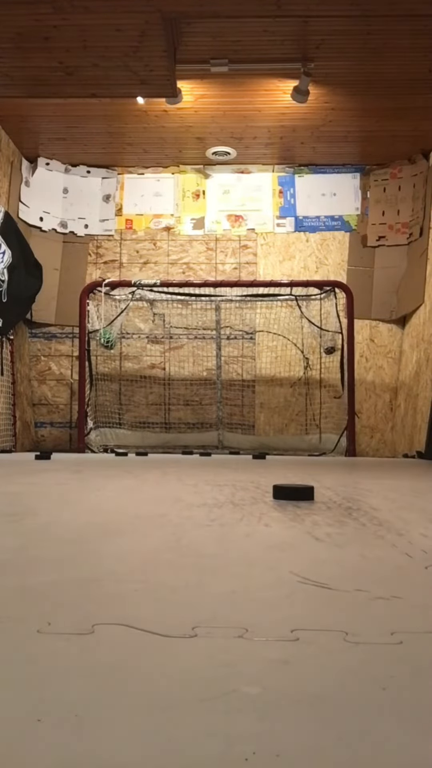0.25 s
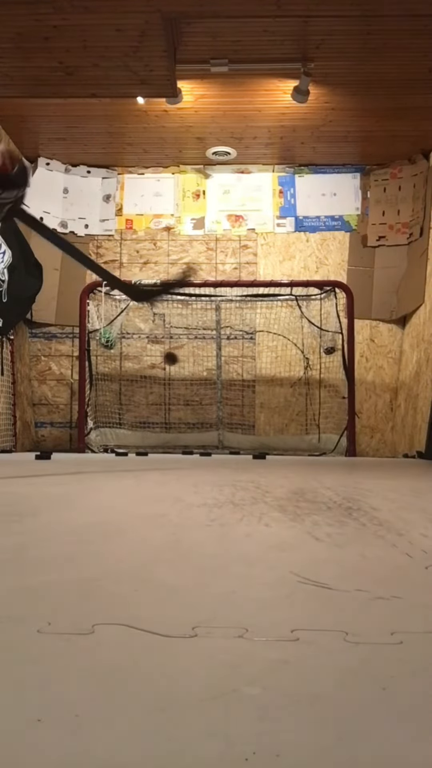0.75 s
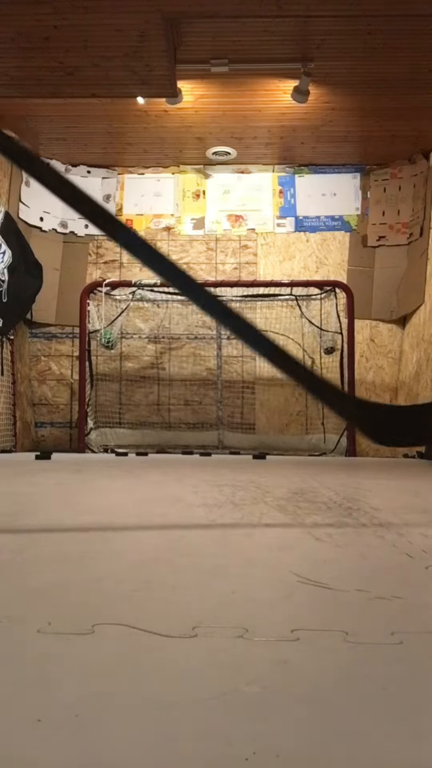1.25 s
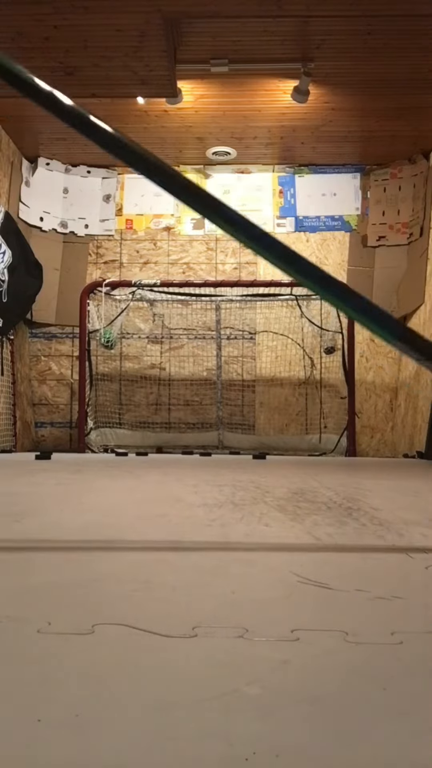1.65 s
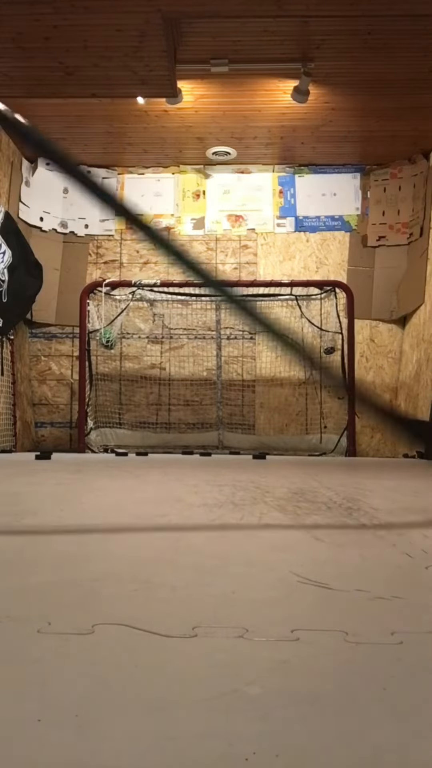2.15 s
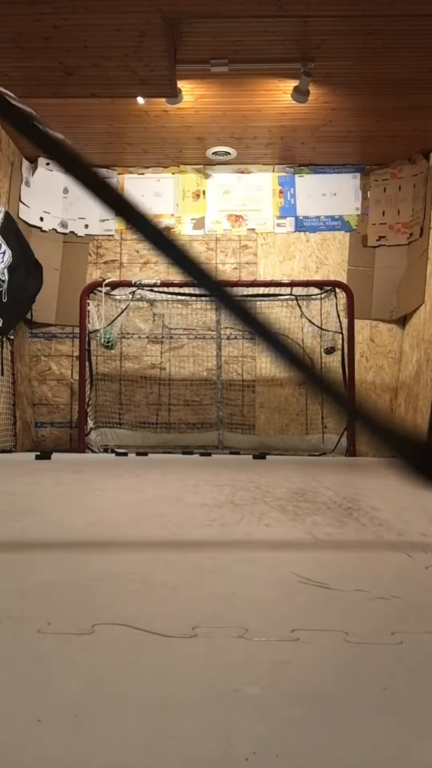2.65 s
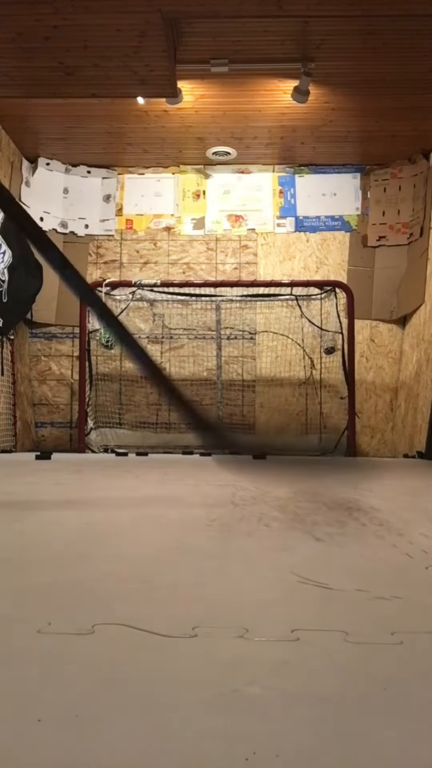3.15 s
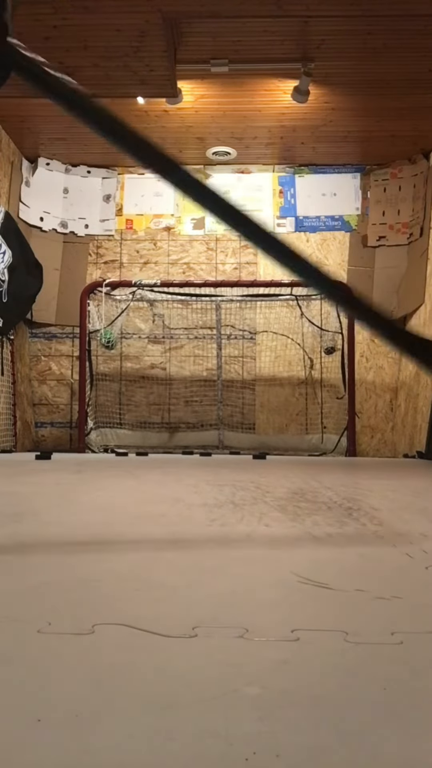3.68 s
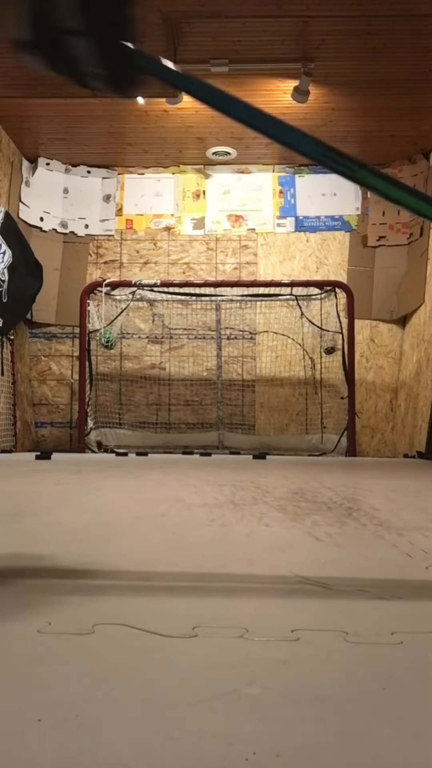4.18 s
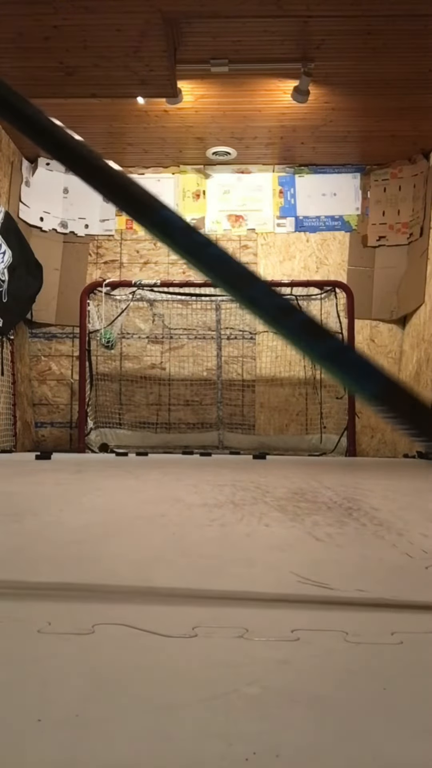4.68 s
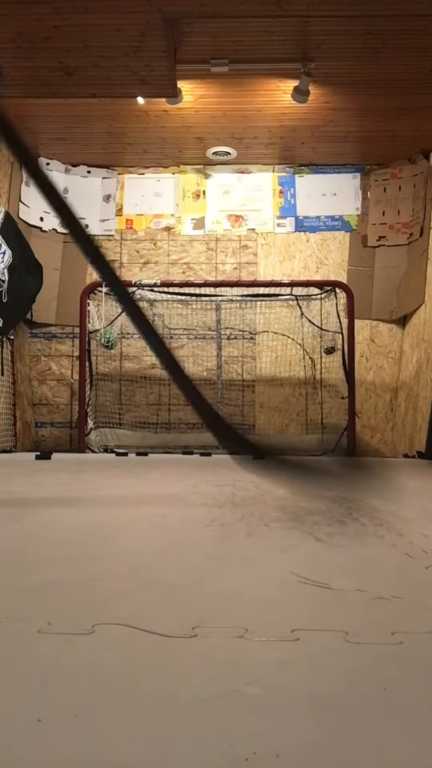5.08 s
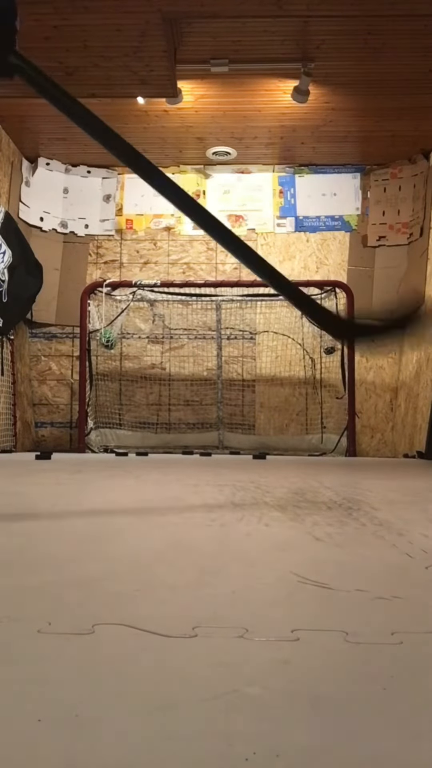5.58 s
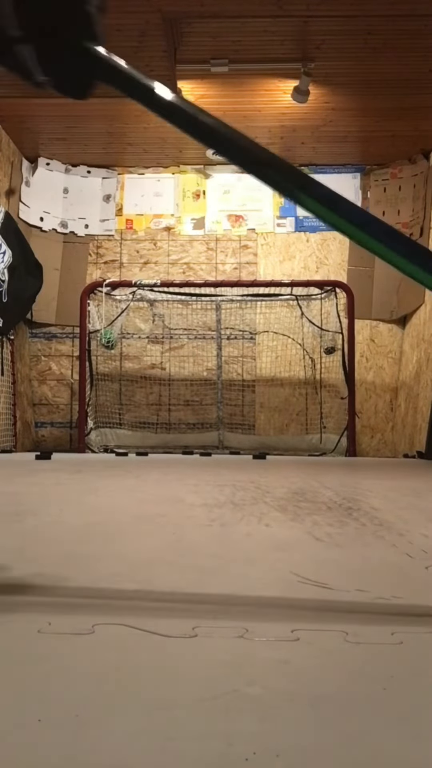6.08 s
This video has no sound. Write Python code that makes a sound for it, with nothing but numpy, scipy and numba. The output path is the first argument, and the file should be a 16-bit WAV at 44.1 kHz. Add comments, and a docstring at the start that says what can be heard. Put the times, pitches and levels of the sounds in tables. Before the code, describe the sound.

In a small wood-lined basement, a phone lying close to the floor picks up a hockey stick on hollow plastic tiles. A soft drag leads to a sharp slap, then taps and low groaning scrapes. A loud slam rings the steel goal post, more knocks follow, and another slam hits before two final hard knocks and a groaning drag.

```python
"""A hockey stick drags, taps and shoots rubber pucks on plastic floor tiles in a wood-lined basement.
A soft drag comes first, then knocks that ring the tiles; a hard stick slap soon cracks close to the phone.
Around two seconds slowing drags groan; midway a hard slam sets the steel goal post ringing.
Taps and drags follow, then another slam with a faint ring, two hard knocks and a last groaning drag.
Knocks and slides are filtered noise and fading tones; the room echoes most of them and a phone limits the hits."""
import sys
import numpy as np
from scipy import signal
from scipy.fft import rfft, irfft
from scipy.io import wavfile
from numba import njit

SR = 44100
rng = np.random.default_rng(int(sys.argv[2]) if len(sys.argv) > 2 else 0)


def transcribe(u):
    """Save the signal u as a 16-bit wav file named by the first command-line argument.

    u: samples, shape (n,) or (channels, n), limited to [-1, 1]; the rate is SR.
    q: integer samples, one column per channel.
    """
    v = np.clip(np.atleast_2d(u).T, -1, 1)
    q = np.round(v * 32767).astype(np.int16)
    wavfile.write(sys.argv[1], SR, q)


N = 279153  # length in samples
SWELL_DB, FADE_DB = 22.5, 31.5  # a drag climbs this much as it starts and loses this much as it ends


def undb(db):
    """Turns decibels into an amplitude factor."""
    return 10 ** (np.asarray(db) / 20)


def unit(x):
    """Scales to an rms of 1."""
    return x / np.sqrt(np.mean(x ** 2))


def peak(x):
    """Scales to a peak of 1."""
    return x / np.abs(x).max()


def add(bus, start_s, x):
    """Mixes x into the bus at start_s seconds."""
    i = int(start_s * SR)
    bus[i:i + len(x)] += x[:len(bus) - i]


def fade(t, t60):
    """Dies away by 60 dB in t60 seconds."""
    return np.exp(-np.log(1000) * t / t60)


def rise(t, rise_s):
    """Soft start: rubber needs a moment to load."""
    return (1 - np.exp(-t / rise_s)) ** 2


def band(x, hz, width_hz):
    """A resonance with gain 1 at its centre."""
    return signal.lfilter(*signal.iirpeak(hz, hz / width_hz, fs=SR), x)


@njit
def sweep(x, hz, k):
    """A band-pass whose centre moves; k is its width divided by its centre."""
    y, band_state, low_state = np.empty(len(x)), 0., 0.
    for i in range(len(x)):
        g = np.tan(np.pi * hz[i] / SR)
        v = (band_state + g * (x[i] - low_state)) / (1 + g * (g + k))
        band_state = 2 * v - band_state
        low_state = low_state + 2 * g * v
        y[i] = k * v
    return y


def humps(x, body):
    """Colours x with broad resonances whose powers add."""
    hz = np.fft.rfftfreq(len(x), 1 / SR) + 1  # 1 Hz up, to keep the logarithm finite
    power = 0
    for centre_hz, spread_octaves, db in body:
        octaves_away = np.log2(hz / centre_hz)
        power = power + undb(2 * db) * np.exp(-.5 * (octaves_away / spread_octaves) ** 2)
    return unit(irfft(rfft(x) * np.sqrt(power), len(x)))


def ring(modes, t, scatter_db, detune):
    """Fading tones of a struck body; every blow lands elsewhere and wakes them differently."""
    total = 0
    for hz, db, t60 in modes:
        level_luck, pitch_luck = rng.standard_normal(2)
        tone = np.sin(2 * np.pi * hz * (1 + detune * pitch_luck) * t)
        total = total + undb(db + scatter_db * level_luck) * fade(t, t60) * tone
    return total


def low_hum():
    """A faint, steady low hum: noise through two resonances."""
    return undb(-65) * unit(band(band(rng.standard_normal(N), 270, 70), 220, 100))


def room(x):
    """Dense echoes that build up over some ms and die band by band."""
    # how the room echoes at each pitch: (f/Hz, time to fall 60 dB/s, level/dB)
    echo_bands = np.array([(95, 0.17, 0), (250, 0.43, 2.5), (750, 0.42, 1.5), (1800, 0.59, -3.5),
                           (4800, 0.53, 5.5), (9600, 0.3, -1.5), (13600, 0.077, -3)])
    t = np.arange(SR) / SR
    echo = 0
    for hz in 100 * 2 ** np.arange(0, 7.3, .5):  # half-octave steps
        t60, db = (np.interp(np.log(hz), np.log(echo_bands[:, 0]), echo_bands[:, k]) for k in (1, 2))
        noise = band(band(rng.standard_normal(SR), hz, hz / 2), hz, hz / 2)
        echo = echo + undb(db) * noise * fade(t, t60)
    echo = echo * (1 - np.exp(-t / 0.0023))
    return signal.fftconvolve(x, echo / np.sqrt(np.sum(echo ** 2)))[:N]


def groan():
    """The blade judders as a drag slows: noise in a narrow, rough resonance that sinks."""
    # groaning drags: (start t/s, swell/s, release/s, first f/Hz, last f/Hz, level/dB)
    groaning_drags = [(2.069, 0.094, 0.17, 430, 286, -28.5), (2.6, 0.1074, 0.013, 934, 553, -22),
                      (6.075, 0.016, .18, 385, 221, -13.5)]
    out = np.zeros(N)
    for start_s, swell_s, release_s, first_hz, last_hz, db in groaning_drags:
        t = np.arange(int((swell_s + release_s) * SR)) / SR
        hz = first_hz * (last_hz / first_hz) ** (t / t[-1])
        noise = rng.standard_normal(len(t))
        rub = unit(sweep(sweep(noise, hz, .2), hz, .3))
        level_db = np.interp(t, [0, swell_s, t[-1]], [db - SWELL_DB, db, db - FADE_DB])
        soft_end = np.clip((t[-1] - t) / .01, 0, 1)
        add(out, start_s, rub * soft_end * undb(level_db))
    return out


def slides():
    """Grit catches and lets go in dense uneven ticks; the rasp brightens with the speed of the stroke."""
    # blade and puck sliding: (start t/s, attack/s, hold/s, release/s, rasp level/dB, hiss level/dB,
    # rumble level/dB, rasp centre f/Hz, hiss centre f/Hz)
    strokes = [(0.0, 0.00077, 0.038, .09, -54.5, -59, -63, 4300, 4800),
               (0.09, 0.047, 0.048, 0.067, -69.5, -60, -55, 2000, 6130),
               (0.19, 0.071, 0.071, 0.043, -57.5, -58.5, -63, 2840, 5600),
               (0.333, 0.062, 0.11, 0.031, -49.5, -45.5, -44.5, 3700, 5600),
               (0.451, 0.032, 0.044, 0.088, -17.5, -33, -27.5, 2000, 4830),
               (0.947, 0.072, 0.035, 0.16, -38.5, -39, -38, 1940, 6100),
               (1.152, 0.031, 0.056, 0.077, -53, -45, -45, 676, 5840),
               (1.2, 0.11, 0.13, 0.11, -46, -40.5, -47, 2130, 5800),
               (1.779, 0.0069, 0.0047, 0.14, -37, -98, -24, 557, 4800),
               (1.893, 0.018, 0.18, .02, -60, -72, -37, 590, 4800),
               (2.059, .01, 0.18, 0.029, -94, -86, -37.5, 630, 4700),
               (2.28, 0.011, 0.0042, 0.21, -78, -49.5, -27.5, 620, 5840),
               (2.385, 0.084, 0.047, 0.076, -32.5, -53, -38, 3300, 4100),
               (2.493, 0.052, 0.15, 0.24, -41, -59, -31, 726, 4800),
               (3.005, 0.036, 0.039, 0.049, -29, -27.5, -30, 1505, 4380),
               (3.252, 0.052, 0.031, 0.095, -45.5, -49.5, -48, 4200, 4700),
               (4.007, 0.02, 0.0033, 0.14, -51, -90, -34.5, 1800, 4500),
               (4.096, .03, 0.077, 0.22, -59.5, -69.5, -75, 1200, 4700),
               (4.282, 0.019, .005, 0.46, -55.5, -70, -41, 730, 5570),
               (4.812, 0.086, .1, 0.032, -34, -50.5, -34.5, 1780, 4800),
               (4.97, 0.03, 0.018, 0.086, -30.5, -33.5, -29.5, 2600, 4670),
               (5.773, 0.036, 0.0057, 0.14, -45.5, -55, -52, 2660, 5000),
               (6.063, 0.014, 0.018, 0.075, -27.5, -46, -35, 3820, 4300)]
    # broad resonances that colour the rasp, hiss and rumble: (f/Hz, spread/octaves, level/dB)
    rasp_body = [(1200, 0.31, 4.5), (2570, 0.51, 19.5), (3960, 0.37, 15.5)]
    hiss_body = [(5000, .6, -3), (8500, .25, -6), (13000, .3, -14)]
    rumble_body = [(173, 0.087, -3.5), (260, 0.26, -1.5), (422, 0.9, -2.5), (645, 0.065, -4)]
    glide_octaves = 0.22  # the rasp centre lies this much lower at the slow ends of a stroke

    grit = rng.standard_normal(N) * undb(1.3 * rng.exponential(size=N))
    flutter = unit(band(rng.standard_normal(N), 40, 170))
    grit = grit * undb(2.0 * flutter)
    all_rasp, all_hiss, all_rumble = (humps(grit, body) for body in (rasp_body, hiss_body, rumble_body))
    out = np.zeros(N)
    for start_s, attack_s, hold_s, release_s, rasp_db, hiss_db, rumble_db, rasp_hz, hiss_hz in strokes:
        t = np.arange(int((attack_s + hold_s + release_s) * SR)) / SR
        early = np.clip(1 - t / attack_s, 0, 1)  # 1 at the start, 0 after the attack
        late = np.clip((t - attack_s - hold_s) / release_s, 0, 1)  # climbs to 1 in the release
        start = int(start_s * SR)
        span = slice(start, start + len(t))
        low = rasp_hz * 2 ** (-glide_octaves * (early + late))
        high = np.full(len(t), float(hiss_hz))
        rasp = all_rasp[span] + unit(sweep(sweep(grit[span], low, .7), low, .9))
        hiss = all_hiss[span] + undb(-4.5) * unit(sweep(sweep(grit[span], high, .25), high, .35))
        soft_ends = np.clip(np.minimum(t, t[-1] - t) / 0.01, 0, 1)
        touch = undb(-SWELL_DB * early - FADE_DB * late) * soft_ends
        mix = undb(rasp_db) * unit(rasp) + undb(hiss_db) * unit(hiss) + undb(rumble_db) * all_rumble[span]
        add(out, start_s, touch * mix)
    return out


def hit_pulse(tilt_db):
    """One pulse with the colour of a hard hit, tilted by tilt_db per octave around 2000 Hz."""
    # colour of the hard hits: (f/Hz, level/dB)
    hit_colour = np.array([(59, -40), (100, -22.5), (389, -0.5), (662, -5.5), (930, -16.5), (1360, -6.5),
                           (2170, -6.5), (2580, -4.5), (2800, -5.5), (6990, -12), (16000, -29)])
    hz = np.fft.rfftfreq(2048, 1 / SR) + 1
    colour_db = np.interp(np.log(hz), np.log(hit_colour[:, 0]), hit_colour[:, 1])
    cepstrum = irfft(np.log(undb(colour_db + tilt_db * np.log2(hz / 2000))))
    cepstrum[1:1024] *= 2  # folding keeps the pulse from starting before the blow
    cepstrum[1025:] = 0
    return peak(irfft(np.exp(rfft(cepstrum))))


def hard_hits():
    """Each hard slap or slam cracks once, then clatters for a while in a burst of noise."""
    # hard slaps and slams: (t/s, blow level/dB, blow tilt/dB per octave, clatter level/dB,
    # clatter hold/s, clatter tilt/dB per octave)
    hit_list = [(0.471, -16, 1, -34, 0.043, -2.5), (3.505, -3.5, 1.5, -25, 0.081, 2),
                (5.469, -9.5, 0.5, -17.5, 0.045, 3)]
    crack, clatter, t = np.zeros(N), np.zeros(N), np.arange(SR // 2) / SR
    for start_s, blow_db, tilt_db, clatter_db, hold_s, clatter_tilt_db in hit_list:
        add(crack, start_s, undb(blow_db) * hit_pulse(tilt_db))
        shake = rng.standard_normal(len(t)) * fade(np.maximum(t - hold_s, 0), 0.19)
        add(clatter, start_s, undb(clatter_db) * signal.fftconvolve(hit_pulse(clatter_tilt_db), shake))
    return crack, clatter


def goal_post():
    """The struck steel post rings on as fading tones until it stops."""
    # goal post set ringing: (t/s, ring level/dB, ring stops at t/s)
    post_strikes = [(3.505, -25.5, 4.31), (5.469, -50, 6.04)]
    # tones of the steel post: (f/Hz, level/dB, time to fall 60 dB/s)
    post_tones = [(2379, 0, 1.8), (2415, -3, 1.7), (2432, -3, 1.3), (2451, -4, 1.2), (2561, 11, .55),
                  (2639, 9, .3)]
    out, t = np.zeros(N), np.arange(2 * SR) / SR
    for start_s, post_db, stop_s in post_strikes:
        stop = np.clip((stop_s - start_s - t) / .04, 0, 1)  # a 40 ms ramp down to silence
        add(out, start_s, undb(post_db) * ring(post_tones, t, 0, 0) * stop)
    return out


def tile_thud(t, centre_hz):
    """Hollow tiles ring; the spot that is struck favours the tones near one pitch."""
    # tones of the hollow tiles: (f/Hz, level/dB, time to fall 60 dB/s)
    tile_tones = [(151, -20.5, 0.02), (186, 1, 0.086), (240, 1, 0.086), (299.7, -5.5, 0.14),
                  (411, -3, 0.12), (568, 2.5, 0.055), (703, -3, 0.093)]
    spot = [(hz, db - 4.15 * abs(np.log2(hz / centre_hz)), t60) for hz, db, t60 in tile_tones]
    return peak(ring(spot, t, 1.4, 0.066) * rise(t, 0.002))


def blade_crack(t):
    """Short tones of the blade, roughened as the contact skids for a few ms."""
    # tones of the blade: (f/Hz, level/dB, time to fall 60 dB/s)
    blade_tones = [(850, -3, .012), (1200, -2, .01), (1650, 0, .01), (2200, 0, .009), (2900, -4, .007),
                   (3800, -8, .005)]
    chatter = rng.standard_normal(2000) * fade(t[:2000], .035)
    blade = ring(blade_tones, t, 2., .06) * rise(t, .0006)
    return peak(np.convolve(blade, chatter)[:len(t)])


def sharp_tick(t):
    """A brief burst of bright noise at the contact."""
    grit = rng.standard_normal(len(t)) * fade(t, .02) * rise(t, 0.00012)
    return peak(band(band(grit, 5500, 5000), 5500, 8000))


def knocks():
    """Thud, crack and tick of each knock, straight to the phone and into the room."""
    # stick and puck knocks: (t/s, tile thud level/dB, blade crack level/dB, sharp tick level/dB,
    # room share level/dB, thud centre f/Hz)
    knock_list = [(0.123, -27.5, -40.5, -52, 4, 250), (0.334, -30, -39, -56, 6, 248),
                  (0.4442, 0, 5.5, -10.5, -4, 300), (0.459, -17, -7.5, -2.5, -16, 243),
                  (1.06, -25, -56, -21.5, 6, 226), (1.187, -17.5, -28, -43, -1.5, 219),
                  (1.22, -18.5, -21, -45, 5, 306), (1.655, -66, -46, -58, 0.5, 227),
                  (1.782, -29.5, -19, -43.5, -7, 605), (1.79, -17.5, -20.5, -68, -19, 482),
                  (2.048, -12.5, -14.5, -56, -0.5, 316), (2.26, -3.5, -5.5, -11, 0, 266),
                  (2.569, -50, -16.5, -62, 6.5, 620), (2.794, -5.5, -3.5, -9.5, 1.5, 175),
                  (2.879, -12.5, -14, -42, 1.5, 204), (2.924, -24, -48, -48, -20.5, 231),
                  (3.022, -15.5, -13, -33.5, 2, 256), (3.439, -58, -44.5, -47.5, 3.5, 183),
                  (3.505, -19, -10, -18.5, -18, 330), (3.65, -29, -49, -35, 23, 470),
                  (4.013, -18.5, -20, -55, -15, 234), (4.104, -27.5, -33.5, -62.5, 6, 305),
                  (4.307, -31.5, -47, -46, 15.5, 343), (4.395, -57, -60, -51.5, -13.5, 304),
                  (4.488, -21.5, -26, -68, 1, 240), (4.498, -8, -12, -29, 1, 413),
                  (4.527, -11, -14.5, -59, -19, 208), (4.603, -11.5, -19.5, -51, 1, 236),
                  (4.681, -12, -21, -69, -0.5, 244), (4.735, -13.5, -27, -70, 4, 240),
                  (4.776, -19.5, -26, -62.5, 0, 183), (4.834, -19, -28, -53, -10, 168),
                  (5.071, -20.5, -14.5, -49, -1.5, 344), (5.335, -35.5, -64, -76.5, -7, 176),
                  (5.47, -19, -10.5, -13.5, 4.5, 310), (5.801, -48.5, -51, -38.5, 6, 250),
                  (6.039, -3, -6, -17.5, 0.5, 413), (6.077, -28, -20, -37, 5, 373),
                  (6.089, -1.5, -33, -34, 1, 237)]
    near, far, t = np.zeros(N), np.zeros(N), np.arange(SR // 4) / SR
    impulse = 1. * (t == 0)
    dull_click = peak(band(band(impulse, 1300, 2500), 1500, 2300))
    bright_click = peak(band(band(impulse, 5000, 6000), 5000, 7000))
    for start_s, thud_db, crack_db, tick_db, room_db, centre_hz in knock_list:
        thud = undb(thud_db) * tile_thud(t, centre_hz)
        crack = undb(crack_db) * blade_crack(t)
        tick = undb(tick_db) * sharp_tick(t)
        add(near, start_s, thud + crack + tick)
        # the walls blend all directions: the first swings of the tiles and a smooth, broad click
        first_swings = undb(3.5) * fade(t, 0.038) * thud
        click = undb(crack_db + 1.5) * dull_click + undb(tick_db + 2.0) * bright_click
        add(far, start_s, undb(room_db) * (first_swings + click))
    return near, far


def scene():
    """All sources over a faint low hum; knocks, hard cracks and slides also come by the walls."""
    hum = low_hum()
    slide = slides() + groan()
    crack, clatter = hard_hits()
    near, far = knocks()
    wet = room(far + undb(19.5) * crack + undb(-12.5) * slide)
    return (near + crack + clatter + goal_post() + slide + wet + hum)[None]


@njit
def limit(x, top, attack, release):
    """Looks 40 samples ahead, quickly turns down peaks above the ceiling and soon lets the gain back."""
    y, envelope = np.empty(len(x)), 0.
    for i in range(len(x)):
        ahead = abs(x[min(i + 40, len(x) - 1)])
        envelope += (ahead - envelope) * (attack if ahead > envelope else release)
        y[i] = x[i] * min(1., top / (envelope + 1e-9))
    return y


def record(dry):
    """The phone adds hiss, drops the deep bass, limits the hits, rounds the peaks and cuts the top."""
    ceiling_db, attack_s, release_s = -9.5, 0.0011, 0.0049
    x = dry[0] + undb(-82) * rng.standard_normal(N)
    x = signal.sosfilt(signal.butter(5, 115, "high", fs=SR, output="sos"), x)
    x = limit(x, float(undb(ceiling_db)), 1 / (attack_s * SR), 1 / (release_s * SR))
    x = .72 * np.tanh(x / .72)
    return signal.sosfilt(signal.ellip(10, .2, 80, 15800, fs=SR, output="sos"), x)[None]


dry = scene()
out = record(dry)
transcribe(out)
```